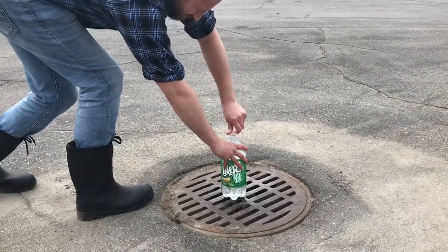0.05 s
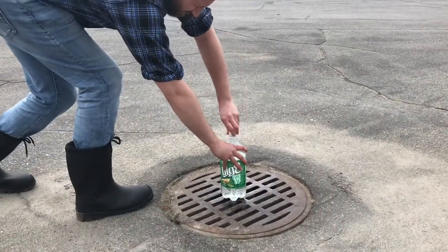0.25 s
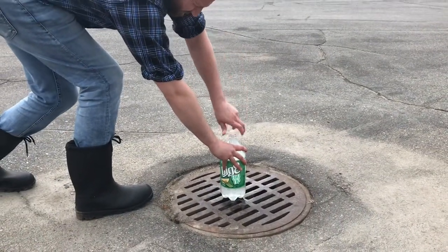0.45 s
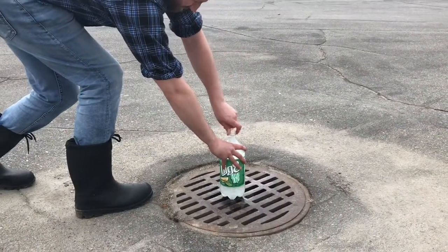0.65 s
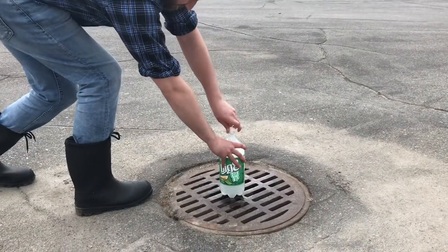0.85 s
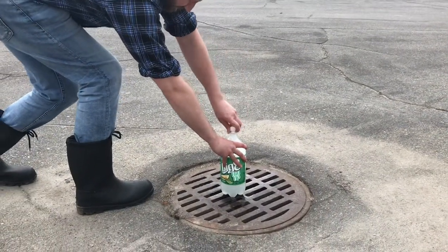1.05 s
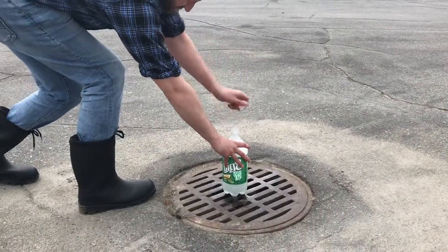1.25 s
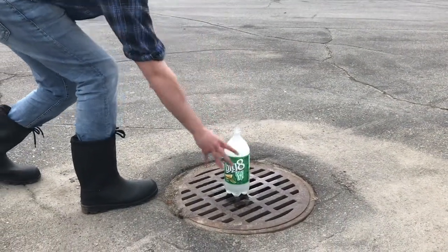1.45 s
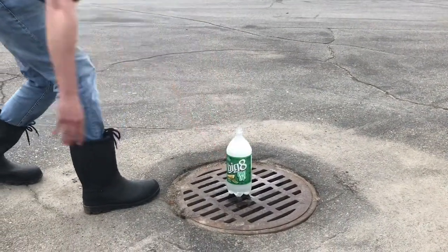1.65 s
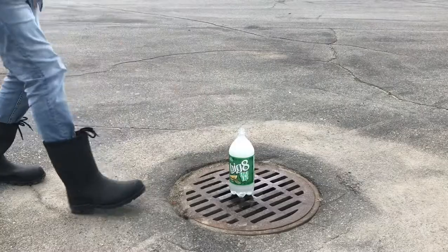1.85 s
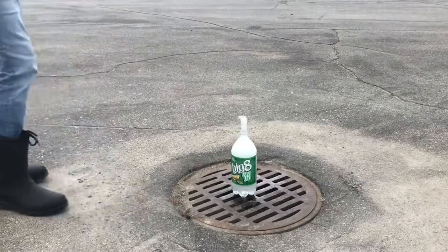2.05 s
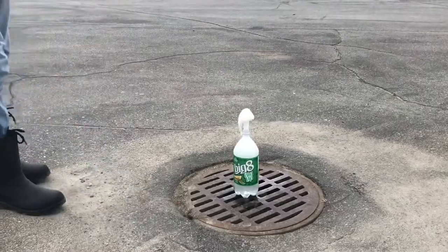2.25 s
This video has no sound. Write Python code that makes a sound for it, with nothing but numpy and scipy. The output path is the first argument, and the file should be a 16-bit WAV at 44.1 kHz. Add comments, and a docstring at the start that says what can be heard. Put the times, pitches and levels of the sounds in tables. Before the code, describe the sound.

A soda bottle hisses sharply open, then small cap clicks and boot steps follow outdoors.

```python
"""Gas escapes from a shaken soda bottle: it seeps past the cap, then bursts out in one sharp hiss.
The plastic cap clicks off its thread, fingers make the plastic crackle, and foam fizzes up the neck.
These sounds also bounce off the paved yard. Rubber boots step back over grit, and one sole drags.
Wind nudges the microphone; far off there is a dull hum and one faint chirp."""
import sys
import numpy as np
from scipy import signal
from scipy.fft import rfft, irfft
from scipy.io import wavfile
from scipy.ndimage import uniform_filter1d

SR = 44100
rng = np.random.default_rng(int(sys.argv[2]) if len(sys.argv) > 2 else 0)


def inscribe(sig):
    """Save sig as 16-bit PCM at rate SR to the path in sys.argv[1].

    A 1-D sig is mono; a 2-D sig holds one channel per row.
    Samples are clipped to [-1, 1] before scaling.
    """
    pcm = np.round(np.clip(np.atleast_2d(sig).T, -1, 1) * 32767)
    wavfile.write(sys.argv[1], SR, pcm.astype(np.int16))


N = 101429
T = np.arange(N) / SR


# How loud the high and middle parts of the hiss are: time_s, treble_db, mid_db
JET_LEVELS = [(0.222, -56, -56.5), (0.242, -24.5, -30.5), (0.27, -13.5, -33), (0.288, -15, -29),
              (0.314, -20, -34), (0.332, -17, -29.5), (0.352, -19.5, -35), (0.406, -25, -41),
              (0.448, -40, -54.5), (0.48, -69, -79)]
# The tone of the high part: pitch_hz, relative_db
JET_TREBLE = [(4000, -31), (6000, -11.5), (7500, -4.5), (9000, -2.5), (10400, -2.5), (11300, 0),
              (14000, 3.5), (16000, -2)]
# The tone of the middle part: pitch_hz, relative_db
JET_MID = [(500, -19.5), (1000, -14.5), (2000, -8.5), (3000, -4.5), (3800, -0.5), (5000, 1.5), (6500, 1.5),
           (9000, -18.5)]
# Breathy whistles in the high part: pitch_hz, width_hz, relative_db
WHISTLES = [(8540, 260, -17), (10050, 260, -19), (11230, 300, -14), (12520, 300, -19), (13950, 300, -19)]

def gas_jet():
    """Gas rushes out of the loosened cap as a sharp hiss with faint whistles."""
    treble_db, mid_db = curves(JET_LEVELS)
    whistles = sum(from_db(db) * narrow_noise(hz, width) for hz, width, db in WHISTLES)
    treble = from_db(treble_db) * unit_level(noise(JET_TREBLE) + whistles)
    mid = from_db(mid_db) * noise(JET_MID)
    return during(JET_LEVELS) * (treble + mid)


# How loud the first leak is: time_s, level_db
SEEP_LEVELS = [(0, -39.5), (.04, -42.5), (.12, -43.5), (.22, -45), (.26, -70)]
# The tone of the leak: pitch_hz, relative_db
SEEP_TONE = [(1000, -10.5), (2800, -24), (3800, -2), (5000, -3), (6200, -10.5), (8600, -3), (10500, -5),
             (14000, 0.5), (16000, -0.5)]

def gas_seep():
    """A thin stream of gas squeezes past the closed cap."""
    return during(SEEP_LEVELS) * loudness(SEEP_LEVELS) * noise(SEEP_TONE)


# Where the gap under the cap rings: time_s, pitch_hz
GAP_PITCH = [(.24, 8200), (.285, 9100), (.335, 7200), (.40, 6400)]

def gap_ring(level_db=-28, width_hz=900, peak_s=.295, spread_s=.04):
    """The gas rings in the gap; the pitch lifts briefly, then sinks as the cap turns."""
    swell = np.exp(-((T - peak_s) / spread_s) ** 2)
    return from_db(level_db) * swell * narrow_noise(curves(GAP_PITCH)[0], width_hz)


# Small puffs of gas: peak_s, level_db, half_length_s
WISPS = [(.73, -66, .01), (1.0, -64, .03), (1.18, -60, .009), (1.252, -57, .005)]

def gas_wisps():
    """The last of the gas slips out from under the loose cap."""
    swells = sum(from_db(db) * bump(s, half_length) for s, db, half_length in WISPS)
    return swells * noise(JET_TREBLE)


# Clicks of the cap and bottle: start_s, ring_db, snap_db, pitch_ratio
CAP_CLICKS = [(.500, -35, -47, .7), (.528, -43, -61, 1.15), (0.5660, -39, -30.5, 1.13),
              (.570, -39, -47, 1.13), (.5962, -29, -50, .45), (.599, -23.5, -38.5, 0.82),
              (0.6265, -23, -49, 1.0), (.776, -34, -50, 0.97), (0.780, -39, -41, 1.3),
              (.792, -43, -59.5, 0.84), (.799, -32.5, -45, 1.25), (0.8328, -32.5, -55, .85),
              (0.8494, -23, -33.5, 1.03), (.8605, -42, -58, 0.85), (.867, -44, -57, 1),
              (.928, -68.5, -47, 0.97), (1.0108, -34.5, -52.5, 1.1), (1.027, -34, -47.5, 0.9),
              (1.040, -36.5, -63, 0.66), (1.0615, -35, -56, 0.55), (1.0725, -35.5, -53, .9),
              (1.2015, -51, -40.5, 0.99), (1.251, -56, -45, 1.2), (1.259, -52, -35, 1.3)]
# The notes the plastic rings with: base_pitch_hz, relative_db, ring_s
PLASTIC_NOTES = [(1240, -13.5, 0.011), (1747, -7, .012), (2200, -9.5, 0.010), (2910, -9.5, 0.010),
                 (3630, -6.5, 0.009), (4050, -8.5, .008), (5400, -15, 0.007), (6990, -14.5, 0.0055)]
# The tone of a snap: pitch_hz, relative_db
SNAP_TONE = [(2000, -15.5), (5000, -6), (8000, -4), (11500, -0.5), (16000, 1.5)]
# The tone of click tails and finger crackle: pitch_hz, relative_db
CRACKLE_TONE = [(900, -3.5), (2000, -1.5), (4400, -1.5), (5500, -13), (16000, -31)]

def cap(low_cut_hz=950, snap_fade_s=.0011, tail_fade_s=.009, tail_below_snap_db=22):
    """Each slip of the thread makes a bright snap, a short ring of thin plastic and a faint tail."""
    # The wall flexes, so its notes shift from click to click.
    rings = sum(from_db(db) * strike(s, PLASTIC_NOTES, ratio, detune=.03)
                for s, db, _, ratio in CAP_CLICKS)
    rings = signal.sosfilt(signal.butter(4, low_cut_hz, "high", fs=SR, output="sos"), rings)
    snaps = sum(from_db(db) * decay(s, snap_fade_s) for s, _, db, _ in CAP_CLICKS)
    tails = sum(from_db(db - tail_below_snap_db) * decay(s, tail_fade_s) for s, _, db, _ in CAP_CLICKS)
    return rings + snaps * noise(SNAP_TONE) + tails * noise(CRACKLE_TONE)


# How loud the handling is: time_s, level_db
FINGER_LEVELS = [(0, -69), (.033, -48.5), (.06, -69), (.46, -65.5), (.54, -63), (.60, -58), (.645, -63.5),
                 (.67, -81.5), (.715, -75.5), (.73, -59.5), (.76, -74), (.79, -53.5), (.815, -63.5),
                 (.86, -51), (.89, -80), (.99, -80.5), (1.035, -59), (1.055, -69), (1.11, -77.5),
                 (1.48, -73), (1.555, -59), (1.61, -65), (1.66, -76)]

def fingers():
    """The plastic crackles as fingers work it."""
    return during(FINGER_LEVELS) * loudness(FINGER_LEVELS) * grains(CRACKLE_TONE, per_s=2500)


# How loud the fizz is: time_s, level_db
FOAM_LEVELS = [(.45, -64), (.68, -77), (1.1, -76), (1.2, -66), (1.45, -67), (1.55, -59.5), (1.63, -68),
               (1.71, -62.5), (1.9, -70), (2.04, -62), (2.1, -69), (2.3, -76)]
# The tone of the fizz: pitch_hz, relative_db
FOAM_TONE = [(1500, 3.5), (4000, 0.5), (9000, -1.5), (12000, -3), (14500, -4), (16000, -9)]

def foam():
    """Foam fizzes softly as it climbs the neck."""
    return loudness(FOAM_LEVELS) * noise(FOAM_TONE)


def ground_echo(sound, delay_s=.000798, strength=.28):
    """The pavement sends back a weaker copy of the sound a moment later."""
    hz = np.arange(N + 1) * SR / (2 * N)
    echo = strength * np.exp(-2j * np.pi * hz * delay_s)
    return irfft(rfft(sound, 2 * N) * (1 + echo))[:N] / np.hypot(1, strength)


# Soles touching the pavement: start_s, thud_db, pitch_ratio, grit_db, grit_fade_s
STEPS = [(1.565, -60, 3, -43, .002), (1.582, -56, 4.1, -39, 0.0018), (1.6524, -58, 3.7, -45, 0.0021),
         (1.674, -78, 2.7, -45.5, 0.0031), (1.6863, -37, 3.1, -36, 0.0026), (1.693, -43, 1.2, -46, 0.009),
         (1.7715, -38.5, 1, -39, 0.0025), (1.779, -41, .9, -51, .003), (1.795, -38, 0.72, -64, 0.0028),
         (1.8343, -38, 1.01, -40.5, 0.0035), (1.837, -23.5, 0.99, -41.5, 0.0055),
         (1.8675, -36, 1.14, -38, 0.003), (1.8705, -32, 1, -51, 0.0023), (1.957, -33, 0.84, -35, 0.0045),
         (1.962, -23, 0.78, -51, .004), (1.973, -27.5, 3, -34.5, 0.005), (1.9979, -27, 0.99, -38, 0.0011),
         (2.028, -42, 2.6, -42, .01), (2.081, -42, .7, -58, .015)]
# The notes of a rubber boot: base_pitch_hz, relative_db, ring_s
BOOT_NOTES = [(168, -11, 0.038), (261, -0.5, .04), (336, -8, 0.05), (600, -13, 0.028), (710, -19, 0.028),
              (946, -14.5, 0.039), (1365, -19, 0.025), (1890, -22, .025)]
# The tone of crushed grit: pitch_hz, relative_db
GRIT_TONE = [(500, -8), (1000, -3), (2500, -0.5), (6000, 0), (10000, -4.5), (16000, -11)]

def boots():
    """Rubber soles thud down and crush fine grit."""
    thuds = sum(from_db(db) * strike(s, BOOT_NOTES, ratio) for s, db, ratio, _, _ in STEPS)
    crunch = sum(from_db(db) * decay(s, fade_s) for s, _, _, db, fade_s in STEPS)
    return thuds + crunch * grains(GRIT_TONE, per_s=14000)


# Cracks of gravel: start_s, level_db, pitch_hz
PEBBLE_CRACKS = [(1.547, -48, 3000), (1.5645, -40.5, 3200), (1.624, -50, 2900), (1.7718, -42, 3000),
                 (1.9615, -35, 6000), (1.9735, -27, 1900), (1.9825, -36, 3400), (2.026, -31, 1750),
                 (2.0265, -36, 3300)]
# The notes of one pebble: pitch_ratio, relative_db, ring_s
PEBBLE_NOTES = [(1, 0, .008), (1.48, -5, .006), (2.9, -6, .004)]

def pebbles():
    """Single bits of gravel crack under the soles and ring briefly."""
    return sum(from_db(db) * strike(s, PEBBLE_NOTES, hz) for s, db, hz in PEBBLE_CRACKS)


# One drag of a sole: time_s, level_db, slips_per_s
DRAG = [(1.947, -60, 120), (1.955, -39, 120), (1.963, -27, 130), (1.99, -29.5, 165), (2.015, -25, 309),
        (2.026, -35, 330), (2.04, -38, 300), (2.07, -58, 250)]
# The notes of that sole: pitch_hz, relative_db, ring_s
SOLE_NOTES = [(161, -1.5, 0.061), (240, -6, .03), (338, 0.5, .055), (700, -15.5, 0.05), (870, -19.5, 0.025),
              (1060, -18, 0.04), (1280, -22, 0.02), (1850, -19, .035), (2750, -22.5, 0.03)]
# The tone of rolling grit: pitch_hz, relative_db
ROLLING_TONE = [(500, -3), (1000, -1), (1900, 0.5), (4500, -3), (6200, -3), (8000, -11), (16000, -17)]

def scuff(unevenness=.22, grit_db=-14):
    """A dragged sole sticks and slips in a quickening judder, rolling grit under it."""
    drag_db, slips_per_s = curves(DRAG)
    waver = np.interp(T, T[::200], rng.standard_normal(len(T[::200])))
    slip_count = np.floor(np.cumsum(slips_per_s * np.exp(unevenness * waver)) / SR)
    slips = np.diff(slip_count, prepend=0)
    judder = sum((-1) ** k * from_db(db) * ring(slips, hz, ring_s)
                 for k, (hz, db, ring_s) in enumerate(SOLE_NOTES))
    # Remove slow drift and even out the level, so that DRAG sets the loudness.
    judder -= uniform_filter1d(judder, size=900)
    judder /= np.sqrt(np.abs(uniform_filter1d(judder ** 2, size=700)) + 1e-9)
    grit = from_db(grit_db) * grains(ROLLING_TONE, per_s=5000)
    return during(DRAG) * from_db(drag_db) * (judder + grit)


# Puffs of wind: peak_s, level_db, pitch_hz, half_length_s
WIND_PUFFS = [(.2, -36.5, 175, 0.017), (.228, -32, 70, 0.022), (0.26, -40.5, 70, 0.021),
              (0.746, -38.5, 49.85, .014), (0.76, -35.5, 112, 0.0067), (0.836, -46.5, 65, 0.015),
              (0.905, -50.5, 50.3, 0.034), (1.123, -46.5, 58.5, .016), (1.214, -57, 54.4, .03),
              (1.81, -49.5, 65, 0.044), (2.093, -33.5, 56, .014), (2.181, -43.5, 55.8, .016),
              (2.284, -36.5, 60, 0.015)]

def wind():
    """Swirling air hits the microphone in short, low rumbles."""
    rumble = np.zeros(N)
    for s, db, hz, half_length in WIND_PUFFS:
        swell = bump(s, half_length)
        band = signal.butter(3, [hz * .55, hz * 1.8], "band", fs=SR, output="sos")
        puff = swell * signal.sosfilt(band, rng.standard_normal(N))
        rumble += from_db(db) * unit_level(puff) * np.sqrt(np.mean(swell ** 2))
    return rumble


# The tone of the far hum: pitch_hz, relative_db
HUM_TONE = [(26, -32), (45, 1.5), (314, -2), (552, -14), (672, -7), (925, -10), (1020, -11.5), (1270, -9.5),
            (1980, -21.5), (4460, -25), (7470, -38), (9550, -32), (16000, -44)]
# Its slow rise and fall: time_s, relative_db
HUM_SWELL = [(0, 0), (.55, -2), (1.0, 0), (1.45, -1), (1.75, 1), (2.3, 2)]

def yard_hum(level_db=-54.5):
    """A dull, distant hum swells a little."""
    return from_db(level_db) * loudness(HUM_SWELL) * noise(HUM_TONE)


# The path of the chirp: time_s, pitch_hz, level_db
CHIRP = [(1.10, 2900, -84), (1.125, 2836, -66), (1.165, 2750, -70), (1.205, 3450, -68), (1.24, 2900, -68),
         (1.27, 2800, -85)]

def far_chirp(blur_hz=220):
    """One faint chirp, blurred by distance."""
    hz, db = curves(CHIRP)
    return during(CHIRP) * from_db(db) * narrow_noise(hz, blur_hz)


def from_db(db):
    """Turn decibels into a number to multiply by."""
    return 10 ** (np.asarray(db) / 20)


def unit_level(sound):
    """Scale a sound so that its average level (rms) is 1."""
    return sound / np.sqrt(np.mean(sound ** 2) + 1e-20)


def curves(rows):
    """Join a table's points with straight lines: one curve for each column after the time."""
    times, *columns = np.transpose(rows)
    return [np.interp(T, times, column) for column in columns]


def loudness(rows):
    """Turn a table of times and decibels into a volume curve."""
    return from_db(curves(rows)[0])


def during(rows):
    """Stay on from a table's first time to its last, with 5 ms fades outside."""
    return np.clip(np.minimum(T - rows[0][0], rows[-1][0] - T) * 200 + 1, 0, 1)


def bump(peak_s, half_length_s):
    """A smooth, bell-shaped rise and fall."""
    return np.exp(-((T - peak_s) / half_length_s) ** 2 / 2)


def decay(start_s, fade_s, rise_s=.0003):
    """A quick rise that peaks at start_s, then dies away."""
    age = np.maximum(T - start_s + rise_s, 0)
    return np.minimum(age / rise_s, 1) * np.exp(-np.maximum(age - rise_s, 0) / fade_s)


def shape_tone(sound, tone):
    """Turn each pitch up or down as a tone table says; the result has level 1."""
    points_hz, points_db = np.transpose(tone)
    hz = np.maximum(np.arange(N + 1) * SR / (2 * N), 1)
    gain = from_db(np.interp(np.log(hz), np.log(points_hz), points_db))
    bass_cut = np.minimum(hz / points_hz[0], 1) ** 2
    return unit_level(irfft(rfft(sound, 2 * N) * gain * bass_cut)[:N])


def noise(tone):
    """Steady noise with the given tone."""
    return shape_tone(rng.standard_normal(N), tone)


def narrow_noise(hz, width_hz):
    """Breathy noise close to one steady or moving pitch."""
    smoothing = signal.butter(2, width_hz / 2, fs=SR, output="sos")
    flutter = signal.sosfilt(smoothing, rng.standard_normal((2, N)))
    phase = 2 * np.pi * np.cumsum(hz * np.ones(N)) / SR
    return unit_level(flutter[0] * np.cos(phase) + flutter[1] * np.sin(phase))


def grains(tone, per_s, spread_db=3.5, ring_cycles=18):
    """Many tiny clicks of uneven size, each ringing briefly at one of 24 pitches."""
    sizes = from_db(spread_db * np.minimum(rng.exponential(1, N), 3)) * rng.choice([-1, 1], N)
    clicks = sizes * (rng.random(N) < per_s / SR)
    pitch_choice = rng.integers(0, 24, N)
    rings = sum(hz * ring(clicks * (pitch_choice == k), hz, ring_cycles / hz)
                for k, hz in enumerate(np.geomspace(700, 15000, 24)))
    return shape_tone(rings, tone)


def ring(clicks, hz, ring_s):
    """Each click starts a pure note that fades by 60 dB in ring_s."""
    fade = from_db(-60 / (ring_s * SR))
    angle = 2 * np.pi * hz / SR
    return signal.lfilter([0, np.sin(angle)], [1, -2 * fade * np.cos(angle), fade ** 2], clicks + 1e-18)


def strike(start_s, notes, pitch_scale=1, detune=0, uneven_db=2):
    """One knock rings all of an object's notes, each with a slightly random strength."""
    age = T[:SR // 5]
    knock = np.zeros(len(age))
    for k, (hz, db, ring_s) in enumerate(notes):
        level = from_db(db + uneven_db * rng.normal() - 60 * age / ring_s)
        pitch_hz = hz * pitch_scale * np.exp(detune * rng.normal())
        knock += (-1) ** k * level * np.sin(2 * np.pi * pitch_hz * age)
    return np.concatenate([np.zeros(int(start_s * SR)), knock, np.zeros(N)])[:N]


def scene():
    """The bottle, the feet and the background meet at one microphone."""
    gas = gas_jet() + gas_seep() + gap_ring() + gas_wisps()
    bottle = ground_echo(gas + cap() + fingers() + foam())
    feet = boots() + pebbles() + scuff()
    return (bottle + feet + wind() + yard_hum() + far_chirp())[None]


def record(dry):
    """Cut away the very highest treble."""
    cutoff_hz = 15850
    treble_cut = signal.firwin(401, cutoff_hz, window=("kaiser", 8), fs=SR)
    return signal.fftconvolve(dry, treble_cut[None], "same")


dry = scene()
out = record(dry)
inscribe(out)
```